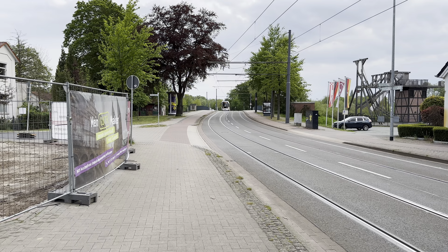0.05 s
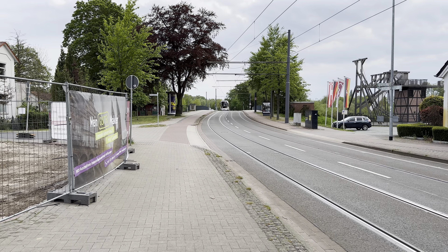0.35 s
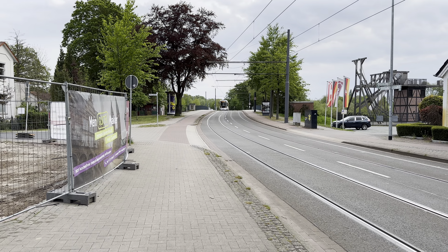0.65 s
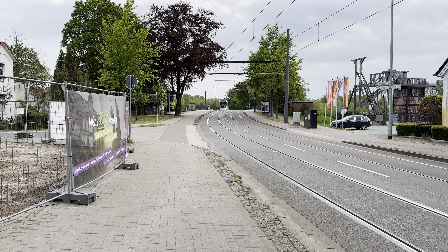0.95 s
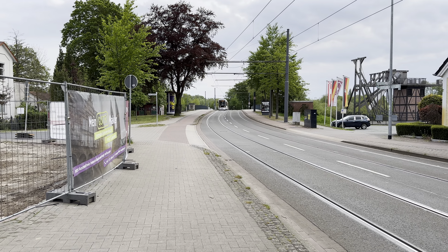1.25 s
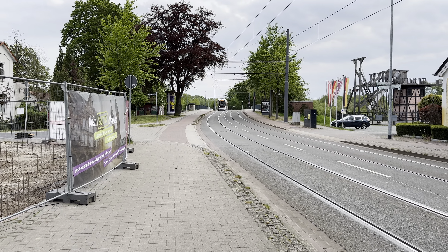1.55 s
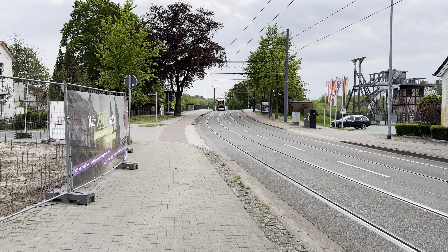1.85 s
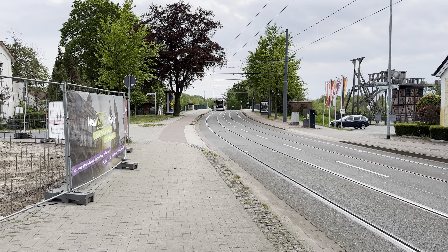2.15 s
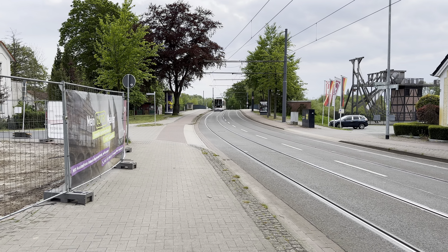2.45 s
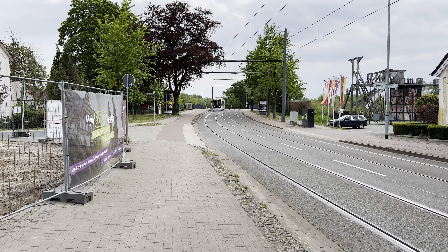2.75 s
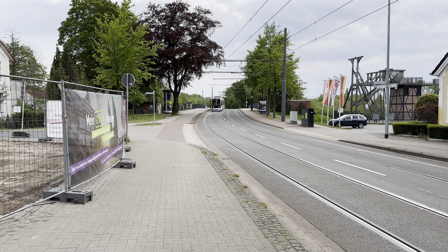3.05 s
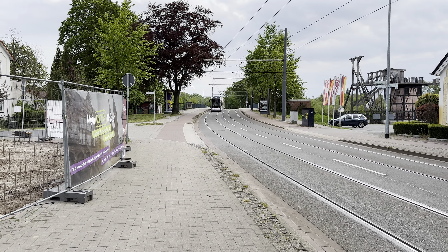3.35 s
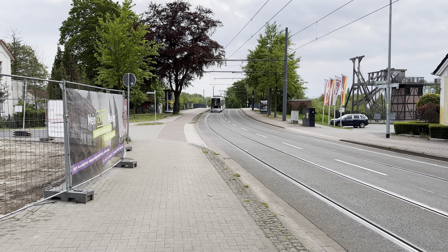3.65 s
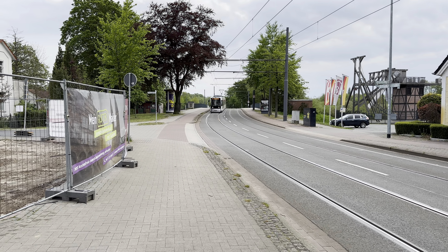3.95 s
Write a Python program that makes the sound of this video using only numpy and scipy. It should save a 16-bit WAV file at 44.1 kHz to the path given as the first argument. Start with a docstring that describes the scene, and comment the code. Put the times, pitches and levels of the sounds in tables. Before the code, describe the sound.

A car that has just passed rolls away along a suburban road, its tyre noise fading and dulling over four seconds into steady distant traffic. Its wavering engine drone swells around 0.9 and 1.7 seconds, then disappears. From about 2 seconds a faint ringing hiss grows, likely a far-off tram. Wind buffets the microphone throughout with low rumble and short thumps, gusting near 3 and 3.6 seconds.

```python
"""Beside a suburban road on a breezy day, on a microphone with two closely spaced ports.
A car that has just gone by rolls away: its tyre noise and engine drone fade and dull into the wash
of distant traffic, where a faint ringing hiss grows, likely a tram far up the line.
Wind buffets the microphone throughout, in low lumps with sharper puffs that slow into thumps."""
import sys
import numpy as np
from scipy import signal
from scipy.fft import rfft, irfft
from scipy.io import wavfile
from scipy.ndimage import uniform_filter1d

SR = 44100
rng = np.random.default_rng(int(sys.argv[2]) if len(sys.argv) > 2 else 0)


def output_pcm(signal):
    """Save a mono or channel-first signal as 16-bit PCM at the path in sys.argv[1].

    Samples are clipped to [-1, 1] before scaling.
    """
    pcm = np.clip(np.atleast_2d(signal).T, -1, 1) * 32767
    wavfile.write(sys.argv[1], SR, np.round(pcm).astype(np.int16))


N = 176400
TIME = np.arange(N) / SR

# scattered street sound at the two ports (frequency [Hz], likeness [0-1], left's phase lead [rad])
STREET_PORTS = [(100, 1, 0), (450, 0.52, 1.33), (960, 0.28, 0.54), (1410, 0.29, 0.98), (2110, 0.82, 4.5),
                (2540, 0, 3.5), (3870, 0.7, -0.5), (4870, 0.6, -6.5), (5330, 0, 0.5), (6880, 0, 7),
                (8300, 0.55, -3)]


def amp(db):
    """Decibels to gain."""
    return 10 ** (np.asarray(db) / 20)


def unit(x):
    """Scales to rms 1."""
    return x / np.sqrt(np.mean(abs(x) ** 2) + 1e-20)


def over_time(rows, t):
    """The columns of a time table at times t."""
    at, *columns = np.transpose(rows)
    return [np.interp(t, at, c) for c in columns]


def over_hz(rows, hz):
    """The columns of a frequency table, joined on a log axis."""
    at, *columns = np.transpose(rows)
    return [np.interp(np.log(hz + 1), np.log(at), c) for c in columns]


def sides(balance_db):
    """Left and right gains of unit mean power."""
    gains = np.array([amp(balance_db / 2), amp(-balance_db / 2)])
    return gains / np.sqrt((gains ** 2).mean(0))


def bell(centre_s, half_length_s):
    """A smooth swell of height 1."""
    return np.exp(-0.5 * ((TIME - centre_s) / half_length_s) ** 2)


def wander(rate_hz):
    """Two smooth random curves of joint rms 1."""
    hz = np.fft.rfftfreq(N, 1 / SR)
    return unit(irfft(rfft(rng.standard_normal((2, N))) * np.exp(-(hz / rate_hz) ** 2), N))


def narrow_band(hz, width_hz, level_db, shift_rad):
    """A fuzzy note, reaching the right port with a phase shift."""
    a, b = wander(width_hz)
    note = (a + 1j * b) * np.exp(2j * np.pi * hz * TIME) * amp(level_db)
    return np.array([note, note * np.exp(1j * shift_rad)]).real


def port_link(rows, hz):
    """Likeness and phase between the ports as one complex number for each frequency."""
    likeness, phase = over_hz(rows, hz)
    return np.clip(likeness, 0, 0.98) * np.exp(-1j * phase)


def frame_grid(size=1024):
    """Frame times (a column) and bin frequencies of the short-time spectra."""
    hop = size // 4
    return np.arange(N // hop + 5)[:, None] * hop / SR, np.fft.rfftfreq(size, 1 / SR)


def road_noise(colour, level_db, link, patchy_db, flicker_db, size=1024):
    """Rolling noise at both ports, with drifting patches and a slight shared flicker."""
    t, hz = frame_grid(size)
    a, b, c, d, patches = rng.standard_normal((5, len(t), len(hz)))
    patches = unit(uniform_filter1d(uniform_filter1d(patches, size=14, axis=0), size=7, axis=1))
    flicker = unit(uniform_filter1d(rng.standard_normal(t.shape), size=10, axis=0))
    left = a + 1j * b
    right = link * left + np.sqrt(1 - abs(link) ** 2) * (c + 1j * d)
    colour_db, balance_db = over_hz(colour, hz)
    spectra = np.array([left, right]) * unit(amp(colour_db)) * sides(balance_db)[:, None]
    spectra *= amp(level_db + patchy_db * patches + flicker_db * flicker)
    _, noise = signal.istft(spectra.swapaxes(1, 2), nperseg=size, noverlap=size * 3 // 4)
    return noise[:, :N] * np.sqrt(3 / size)


def turbulence(colour, steady_s, likeness=0.38, steadying=0.8):
    """Coloured noise, partly shared by the ports, with its own swings of level partly evened out."""
    left, right, shared = rng.standard_normal((3, N))
    white = np.sqrt(likeness) * shared + np.sqrt(1 - likeness) * np.array([left, right])
    colour_db = over_hz(colour, np.fft.rfftfreq(N, 1 / SR))[0]
    noise = irfft(rfft(white) * amp(colour_db), N)
    power = uniform_filter1d((abs(signal.hilbert(noise)) ** 2).mean(0), int(steady_s * SR))
    return unit(noise / power ** (steadying / 2))


def car_tyres():
    """Tyre noise fades band by band, and reaches the microphone more scattered as the car rolls away."""
    # the receding car (time [s], roar [dB], upper midrange [dB], hiss [dB], direct share [0-1])
    retreat = [(0.05, -34, -45, -35, 1), (.42, -35, -37.5, -35.5, 0.8), (.9, -35.5, -43, -35.5, 0.78),
               (1.3, -39.5, -57.5, -40.5, 0.75), (1.7, -40, -55, -41, 0), (2.0, -48, -59, -43, 0.3),
               (2.35, -46.5, -59, -44, 0), (2.65, -45, -58, -55.5, 0.54), (4.0, -56.5, -55, -56.5, 0.6)]
    # colour of the tyres (frequency [Hz], relative level [dB], left minus right [dB])
    colour = [(40, -37, 8.5), (80, -13, -9), (129, -5, 3.5), (480, -4, -1), (675, -7.5, -6.5),
              (1290, -8.5, -2.5), (1520, -10.5, 1), (2210, -11, -8.5), (2480, -6, -7), (2900, -16, 0),
              (3340, -13.5, -2), (3920, -21, 1.5), (4760, -19.5, 0), (5750, -22, 17), (6330, -20.5, 3.5),
              (6940, -27.5, 1.5), (8150, -26.5, 1), (9100, -29, -10), (10150, -38, 0.5), (11160, -63.5, 1)]
    # direct sound at the two ports (frequency [Hz], likeness [0-1], left's phase lead [rad])
    direct_ports = [(80, 1, -3), (304, 0.66, -1.0), (614, 0.88, -2.0), (1140, 0.65, -2), (2030, 1, -4.5),
                    (2530, 0.68, -3), (3400, 0.44, -8), (5500, 0.5, -8.5), (9300, 0, -7)]
    roar_hz, upper_hz, hiss_hz = 1390, 2020, 4520
    t, hz = frame_grid()
    roar, upper, hiss, direct = over_time(retreat, t)
    to_upper = np.interp(hz, [roar_hz, upper_hz], [0, 1])
    to_hiss = np.interp(hz, [upper_hz, hiss_hz], [0, 1])
    level_db = roar + (upper - roar) * to_upper + (hiss - upper) * to_hiss
    link = direct * port_link(direct_ports, hz) + (1 - direct) * port_link(STREET_PORTS, hz)
    return road_noise(colour, level_db, link, patchy_db=1.8, flicker_db=0.72)


def tyre_sizzle():
    """The highest part of the tyre hiss, heard only while the car is close to the microphone."""
    hiss = narrow_band(hz=14400, width_hz=1100, level_db=-64.5, shift_rad=0)
    return hiss * bell(centre_s=0.13, half_length_s=0.31)


def distant_traffic():
    """The even wash of traffic farther off, arriving scattered."""
    # colour of the wash (frequency [Hz], relative level [dB], left minus right [dB])
    colour = [(40, -31, -4), (80, -6, 7), (129, -13, -3.5), (259, -8.5, -2), (438, -11.5, -2.5),
              (635, -18, 6), (840, -10.5, 2.5), (1236, -16, 0.5), (1840, -16.5, -2.5), (2190, -24, -0.5),
              (3070, -22.5, -4.5), (3394, -21, -1), (4050, -30.5, -2), (4830, -31, -2), (5460, -35, 5.5),
              (6430, -30, -2), (6770, -39, -3.5), (7850, -42, 2), (8970, -45, -23), (11100, -69.5, -2)]
    _, hz = frame_grid()
    link = port_link(STREET_PORTS, hz)
    return road_noise(colour, level_db=-43, link=link, patchy_db=1.23, flicker_db=0.6)


def engine_drone():
    """Two wavering engine notes leave with the car: the upper nearly clean, the lower a brief swell."""
    # the upper note at the microphone (time [s], level [dB])
    levels = [(0.05, -45), (.66, -51.5), (.88, -37.5), (1.3, -55), (1.7, -41), (2.0, -75)]
    upper_hz, waver_hz, waver_rad = 226.6, 4.1, 0.55
    phase = 2 * np.pi * upper_hz * TIME + rng.uniform(0, 2 * np.pi) + waver_rad * wander(waver_hz)[0]
    upper = np.sqrt(2) * np.cos([phase, phase + 1]) * amp(over_time(levels, TIME)[0])
    lower = narrow_band(hz=164.7, width_hz=waver_hz, level_db=-44, shift_rad=0.62)
    return upper + lower * bell(centre_s=1.41, half_length_s=0.25)


def wind_rumble():
    """Low rumble follows a light breeze and its gusts; small eddies shake each port separately."""
    # colour of the rumble (frequency [Hz], relative level [dB])
    colour = [(20, -48), (35, -14), (52, -2), (72, 1), (110, -5.5), (170, -9.5), (280, -8.5), (450, -24),
              (4000, -82)]
    # gusts on the microphone (time [s], half length [s], level [dB])
    gusts = [(2.95, 0.12, -35), (3.607, 0.07, -33.5)]
    breeze_db, eddy_db, eddy_hz = -41, 2.5, 20
    gust_power = sum((amp(db) * bell(at_s, half_s)) ** 2 for at_s, half_s, db in gusts)
    strength = np.sqrt(amp(breeze_db) ** 2 + gust_power)
    return turbulence(colour, steady_s=0.056) * strength * amp(eddy_db * wander(eddy_hz))


def wind_flutter():
    """Small eddies keep up a faint random flutter right at the microphone."""
    # colour of the flutter (frequency [Hz], relative level [dB])
    colour = [(30, -11), (90, 6.5), (300, 3.5), (490, 2.5), (800, -23.5), (4000, -81)]
    mean_db, spread_db = -51.5, 4.5
    level_db = mean_db + spread_db * wander(rate_hz=22)[0]
    return amp(level_db) * turbulence(colour, steady_s=0.0109)


def wind_puffs():
    """Each eddy hits the microphone with quick, ragged pressure swings that slow into a low thump."""
    # eddies striking the ports (time [s], level [dB], starting rate of the swings [Hz])
    eddies = [(.098, -32, 470), (0.169, -30, 280), (0.297, -30.5, 440), (0.326, -34.5, 380),
              (.864, -32.5, 290), (.995, -34, 200), (1.342, -33, 130), (1.543, -34, 260),
              (1.730, -27.5, 350), (1.761, -32, 190), (1.965, -32, 80), (2.196, -33.5, 219),
              (2.243, -36, 100), (3.02, -36, 360), (3.532, -32, 130), (3.585, -34, 500), (3.638, -30, 350),
              (3.768, -30, 170), (3.861, -33, 360)]
    rise_s, fade_s, slowing_s, end_hz = 0.0019, 0.029, 0.0109, 55.5
    roughness, rough_hz = 0.51, 208
    ragged = 1 + roughness * (wander(rough_hz) + 1j * wander(rough_hz))
    pressure = np.zeros((2, N))
    for at_s, db, start_hz in eddies:
        age = np.maximum(TIME - at_s, 0)
        hz = end_hz + (start_hz - end_hz) * np.exp(-age / slowing_s)
        swings = np.exp(2j * np.pi * (np.cumsum(hz) / SR + rng.random()))
        envelope = np.minimum(age / rise_s, 1) * np.exp(-(age / fade_s) ** 2)
        pressure += amp(db) * envelope * (swings * ragged).real
    low_cut = signal.butter(4, 42, "highpass", fs=SR, output="sos")
    return np.sqrt(2) * sides(balance_db=2.8)[:, None] * signal.sosfilt(low_cut, pressure)


def tyre_song():
    """The tyres sing briefly in one narrow band as the car draws away."""
    song = narrow_band(hz=1498, width_hz=77, level_db=-50, shift_rad=1.65)
    return song * bell(centre_s=1.7, half_length_s=0.33)


def distant_rails():
    """A far-off hiss grows, reaching the ports in opposite phase; three thin rail tones ring in it."""
    # the hiss from far up the road, likely a tram on its rails (time [s], level [dB])
    levels = [(1.7, -64), (2.75, -53), (4.0, -55.5)]
    # ringing modes of the rails (frequency [Hz])
    modes = [3325, 3340, 3466]
    hiss_db = over_time(levels, TIME)[0]
    ring = sum(narrow_band(hz, width_hz=13, level_db=hiss_db - 8.5, shift_rad=2.18) for hz in modes)
    return narrow_band(hz=3400, width_hz=165, level_db=hiss_db, shift_rad=np.pi) + ring


def scene():
    """From the roadside: traffic near and far, and wind on the microphone itself."""
    road = car_tyres() + distant_traffic() + engine_drone() + tyre_song() + distant_rails()
    wind = wind_rumble() + wind_puffs() + wind_flutter()
    return road + wind + tyre_sizzle()


def record(dry):
    """The microphone opens just after the start; a steep low-pass limits the band."""
    open_s, edge_hz = 0.036, 15700
    low_pass = signal.firwin(511, edge_hz, window=("kaiser", 9), fs=SR)
    return signal.oaconvolve(dry * (TIME > open_s), low_pass[None], "same")


dry = scene()
out = record(dry)
output_pcm(out)
```